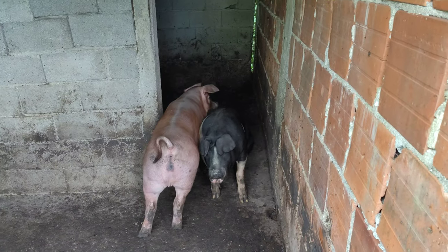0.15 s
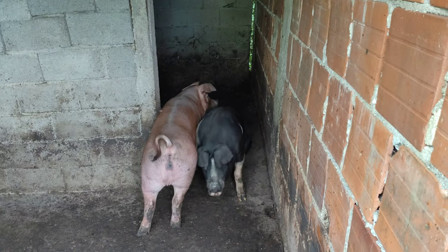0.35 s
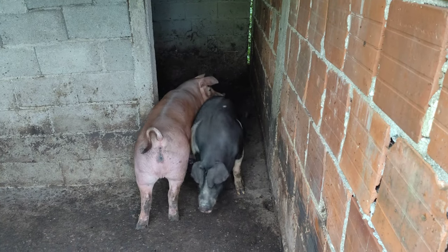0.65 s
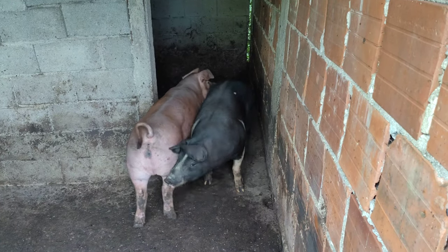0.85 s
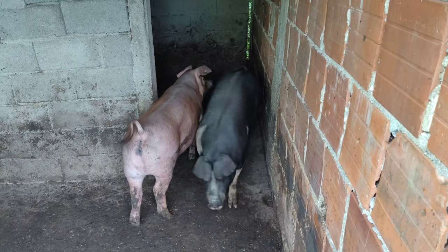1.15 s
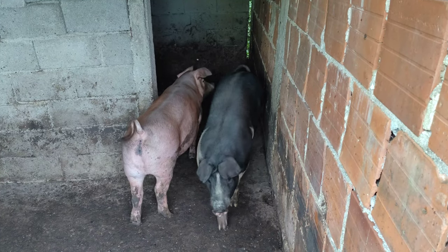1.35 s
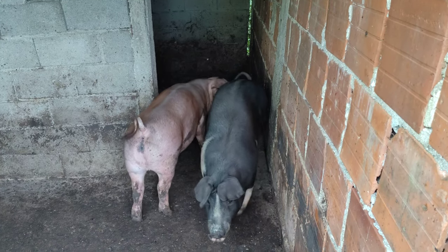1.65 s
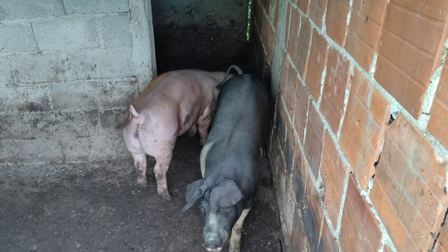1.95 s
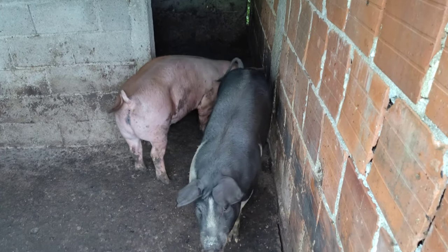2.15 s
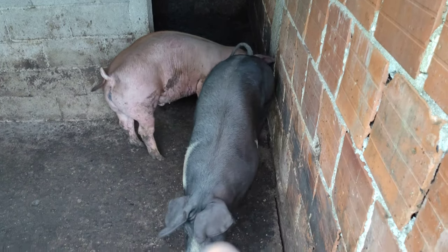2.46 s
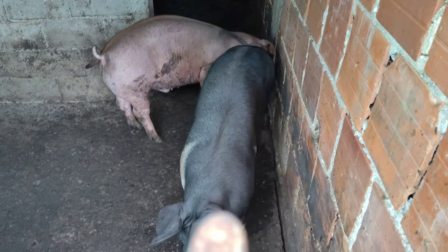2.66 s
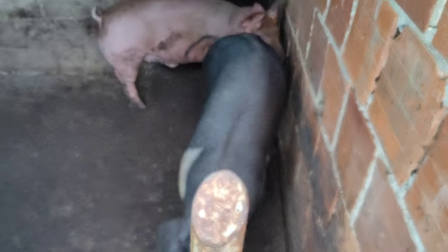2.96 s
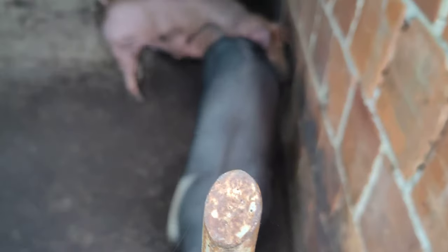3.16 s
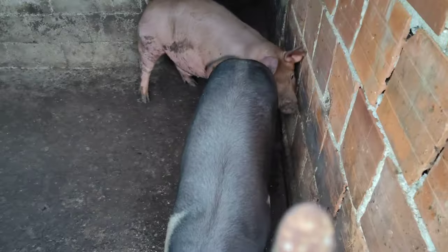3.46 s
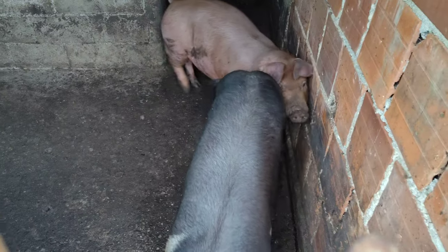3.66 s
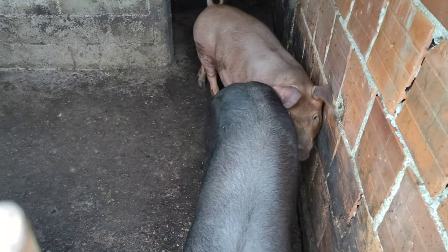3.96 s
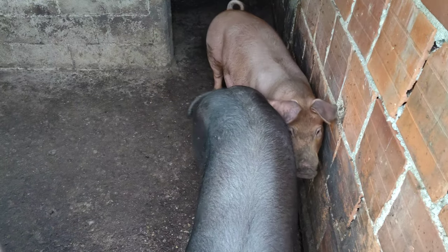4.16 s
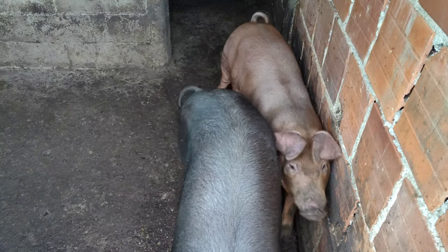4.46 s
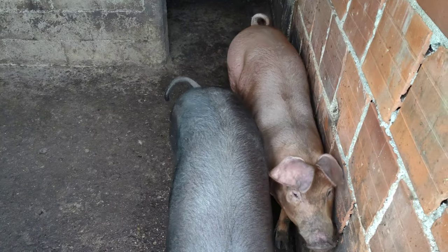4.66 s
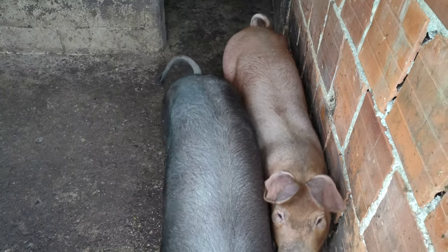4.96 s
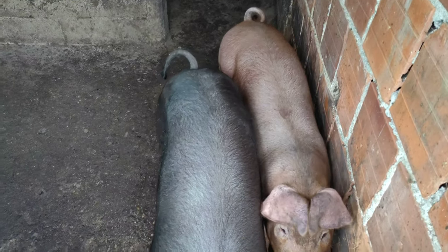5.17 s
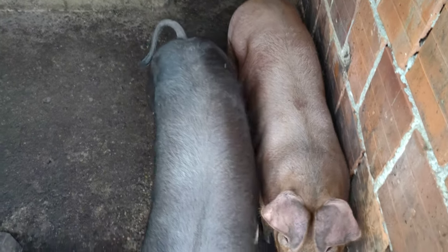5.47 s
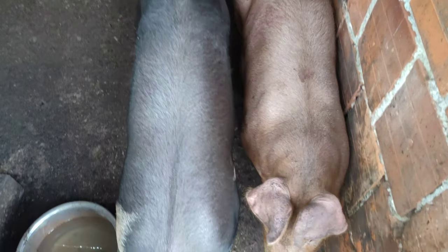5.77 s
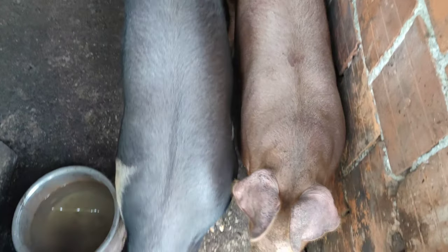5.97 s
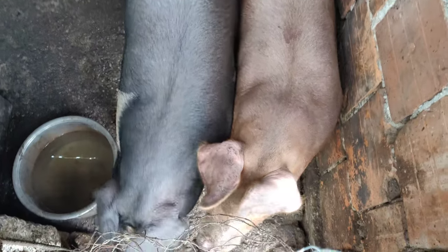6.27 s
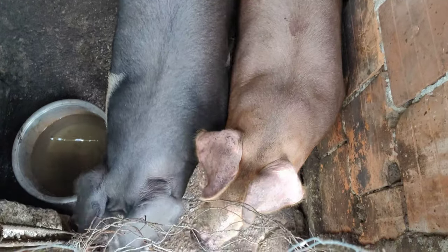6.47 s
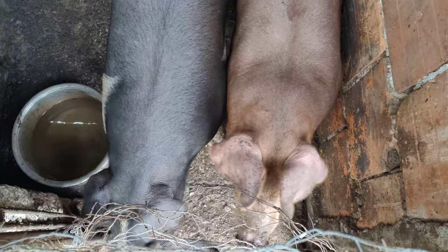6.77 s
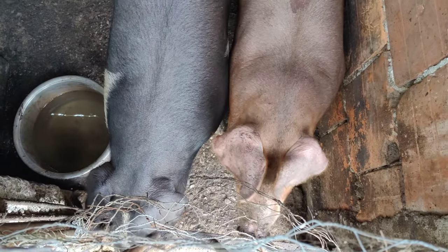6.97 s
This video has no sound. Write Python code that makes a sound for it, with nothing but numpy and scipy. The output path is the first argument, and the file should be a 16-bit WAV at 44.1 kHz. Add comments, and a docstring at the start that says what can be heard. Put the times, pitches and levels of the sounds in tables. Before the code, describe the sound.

Young pigs grunt close to a phone in a small hard-walled pen. A rough grunt and snort open, then sparse grunts, then a rattling growl around two seconds with a thin nostril whistle. Quick short grunts follow over trotters scraping on concrete, and another low growl rolls near the end. Short boomy echoes surround the voices.

```python
"""In a small concrete pen, young pigs grunt and growl close to a phone.
Grunts are separate slaps of the vocal folds, growls run on at 24 to 41 slaps a second;
each slap booms in the chest and rings in throat, mouth and nose, roughened by a puff of noise.
Snorts, whistles and murmurs are noise through single resonances; shuffling is three bands of noise.
The hard walls add early echoes, a short tail and standing waves; a faint whir comes through at the end."""
import sys
import numpy as np
from scipy import signal
from scipy.fft import rfft, irfft, next_fast_len
from scipy.io import wavfile
from scipy.ndimage import uniform_filter1d

SR = 44100
rng = np.random.default_rng(int(sys.argv[2]) if len(sys.argv) > 2 else 0)


def bounce(signal):
    """Save signal as a 16-bit WAV file at the path given by the first command-line argument."""
    frames = np.transpose(np.atleast_2d(signal))
    limited = np.clip(frames, -1, 1)
    pcm = np.round(limited * 32767).astype(np.int16)
    wavfile.write(sys.argv[1], SR, pcm)


N = 313711
TIME = np.arange(N) / SR


def amp(db):
    """Decibels to gain."""
    return 10 ** (np.asarray(db) / 20)


def unit(x):
    """Scales to rms 1."""
    return x / np.sqrt(np.mean(x ** 2) + 1e-30)


def read(points, hz):
    """Reads a table on a log-frequency axis."""
    f, value = np.transpose(points)
    return np.interp(np.log(hz + 1), np.log(f + 1), value)


def follow(rows, t):
    """Every column of a curve, read at t on its first column."""
    start, *columns = np.transpose(rows)
    return np.array([np.interp(t, start, column) for column in columns])


def add(mix, s, sound):
    """Mixes a stereo sound in at time s."""
    part = mix[:, max(round(s * SR), 0):][:, :sound.shape[1]]
    part += sound[:, :part.shape[1]]


def bell(f, hz, width):
    """Gain of one resonance."""
    return 1 / np.sqrt(1 + ((f ** 2 - hz ** 2) / (f * width + 1e-6)) ** 2)


def highpass(x, hz):
    """Second-order low cut."""
    return signal.sosfilt(signal.butter(2, hz, "high", fs=SR, output="sos"), x)


def noise(size, alike):
    """White noise for two microphones that share part of its power."""
    shared = rng.standard_normal(size)
    separate = rng.standard_normal((2, size))
    return np.sqrt(alike) * shared + np.sqrt(1 - alike) * separate


def coloured(gain, size, alike):
    """Stereo noise of rms 1 with the spectrum gain(Hz)."""
    padded = next_fast_len(size)
    spectrum = rfft(noise(padded, alike)) * gain(np.fft.rfftfreq(padded, 1 / SR))
    return unit(irfft(spectrum, padded)[:, :size])


def wobble(size, samples):
    """Smoothed noise of rms 1; more samples make it slower."""
    return unit(uniform_filter1d(rng.standard_normal(size), size=samples))


# fade of the far whir: (time [s], level [dB])
WHIR_FADE = [(6.5, -86), (6.65, -59.5), (7.11, -66)]


def whir():
    """A narrow band of far noise around 1400 Hz."""
    return amp(follow(WHIR_FADE, TIME)) * coloured(lambda f: bell(f, 1400, 220) ** 2, N, 0.2)


def swells(rows, count=3000):
    """Level of short movements, each rising to its peak and dying away exponentially."""
    t = np.linspace(0, TIME[-1], count)
    level = 0
    for s, length, db in rows:
        # the rise takes 0.98 of the length, the decay all of it
        level = level + amp(db) * np.exp(-np.maximum((s - t) / 0.98, t - s) / length)
    return np.interp(TIME, t, level)


def with_grunts(delay, length, db):
    """Level of the air each grunt pushes out, set by its mean belly and chest level."""
    return swells([(s + delay, length, (belly + chest) / 2 + db) for s, belly, chest, *_ in GRUNTS])


# spectra of the dull thuds, the scraping and the gritty hiss: (frequency [Hz], level [dB])
THUD_COLOUR = [(15, -24), (30, -1), (55, 11), (200, -2), (350, -13), (700, -21.5), (2000, -96)]
SCRAPE_COLOUR = [(150, 2.5), (350, -9), (550, 0.5), (800, -5), (1300, -5), (2000, -5.5), (3400, -10),
                 (5000, -16), (8000, -27), (15000, -50)]
HISS_COLOUR = [(1500, -17.5), (3500, 2.5), (5500, 0.5), (8000, -1.5), (10500, -6), (13000, -6.5),
               (15000, -39)]
# how busily the pigs shuffle about: (time [s], bustle [dB])
BUSTLE_CURVE = [(.15, -22), (.3, 3), (.55, -0.5), (.76, -4), (1.15, -11.5), (1.7, -12), (2.0, -4),
                (2.6, -6.5), (3.0, -4), (3.4, 5), (4.1, -11.5), (4.6, 3.5), (4.9, -1), (5.25, -1.5),
                (5.7, -8), (6.45, -2.5), (6.7, -11.5), (7.11, -17.5)]
# heavy steps: (time [s], length [s], level [dB])
HEAVY_STEPS = [(3.28, 0.021, -40), (4.44, 0.041, -39.5), (5.2, 0.22, -45.5)]
# scuffs of trotters and flanks, and hard-blown air: (time [s], length [s], level before the hiss trim [dB])
FLOOR_SCUFFS = [(.78, 0.069, -63.5), (.89, 0.024, -62), (1.51, 0.034, -69.5), (2.42, 0.031, -63.5),
                (2.89, 0.14, -68), (3.48, 0.011, -58), (3.71, 0.0099, -59.5), (3.79, 0.055, -62.5),
                (4.13, 0.13, -60), (4.49, 0.02, -49), (5.17, 0.058, -54.5)]
# (level at 0 dB of bustle, before the band's trim [dB], rise per dB of bustle [dB])
THUD_LAW, SCRAPE_LAW, HISS_LAW = (-56, 0.41), (-53.5, 0.97), (-70, 1.43)
SCRAPE_TRIM_DB, HISS_TRIM_DB = -3.5, 6.5
# a grunt's air, a low thump and then a breath:
#   (delay [s], length [s], level against belly and chest, before the band's trim [dB])
THUMP, EXHALE = (0.019, 0.035, -3), (0.093, 0.051, -20.5)


def shuffle():
    """Thuds, scraping and hiss of the concrete floor, mixed with the air of the grunts."""
    bustle = follow(BUSTLE_CURVE, TIME)[0]
    thud, scrape, hiss = (amp(db + slope * bustle) for db, slope in (THUD_LAW, SCRAPE_LAW, HISS_LAW))
    # levels add as powers
    thud = np.hypot(thud, swells(HEAVY_STEPS) + with_grunts(*THUMP))
    scrape = amp(SCRAPE_TRIM_DB) * np.hypot(scrape, with_grunts(*EXHALE))
    hiss = amp(HISS_TRIM_DB) * np.hypot(hiss, swells(FLOOR_SCUFFS))
    low = thud * coloured(lambda f: amp(read(THUD_COLOUR, f)), N, 0.99)
    middle = scrape * coloured(lambda f: amp(read(SCRAPE_COLOUR, f)), N, 0.56)
    high = hiss * coloured(lambda f: amp(read(HISS_COLOUR, f)), N, 0.06)
    grit = np.exp(0.057 * wobble(N, 60))
    drag = np.exp(0.48 * wobble(N, 2500))  # trotters catch and slide
    return low + grit * (middle + drag * high)


# ring of the pen: (frequency [Hz], time to fall 60 dB [s])
PEN_RING = [(80, 0.48), (200, 0.25), (500, 0.14), (1500, 0.13), (4000, 0.072), (12000, 0.081)]


def pen(x, size=SR // 2):
    """Dense wall echoes, each band dying at its own speed; the bass is alike at both microphones."""
    hz, t, z = signal.stft(rng.standard_normal((2, size)), SR, nperseg=512)
    alike = (1 / (1 + (hz / 1100) ** 2))[:, None]
    z[1] = alike * z[0] + np.sqrt(1 - alike ** 2) * z[1]
    decay = amp(-60 * t / read(PEN_RING, hz)[:, None])
    tail = signal.istft(z * decay, SR, nperseg=512)[1]
    # the tail fades in after 4 ms
    tail = tail * np.clip((np.arange(tail.shape[1]) / SR - .004) / 0.0027, 0, 1)
    return signal.fftconvolve(x, tail / np.linalg.norm(tail[0]), axes=1)[:, :N]


# standing waves between the walls: (frequency [Hz], width [Hz], level [dB])
STANDING_MODES = [(85.7, 7.8, -11.5), (169, 27, -2), (200.8, 10.7, -3), (248.6, 9.6, -4.5)]


def standing_waves(x):
    """The low modes of the pen ring on from one slap to the next."""
    ring = 0
    for hz, width, db in STANDING_MODES:
        ring = ring + amp(db) * signal.lfilter(*signal.iirpeak(hz, hz / width, fs=SR), x)
    return ring


# first echoes from the floor and the nearest walls: (delay [s], level [dB])
FIRST_ECHOES = [(.0047, -26.5), (0.0118, -31.5), (0.0165, -17.5)]


def walls(x):
    """The direct sound and its first echoes, which scatter the rasp more than the boom."""
    rasp = highpass(x, 400)
    out = x
    for delay, db in FIRST_ECHOES:
        out = out + amp(db) * np.pad(rasp, ((0, 0), (round(delay * SR), 0)))[:, :N]
    return out


def breaths(rows, flutter, size=SR // 2):
    """Air forced through one resonance of the snout: it swells, flutters and dies."""
    out, t = np.zeros((2, N)), np.arange(size) / SR
    for s, rise, decay, db, hz, width in rows:
        # low sounds are more alike at the two microphones
        air = coloured(lambda f: bell(f, hz, width) * bell(f, hz, 2 * width), size, 1 / (1 + hz / 7000))
        swell = np.minimum(t / rise, 1) * np.exp(-np.maximum(t - rise, 0) / decay)
        flap = np.exp(flutter * wobble(size, 180))
        add(out, s, amp(db) * swell * unit(air * flap))
    return out


# soft closed-mouth murmurs:
#   (time [s], rise [s], decay [s], level [dB], resonance [Hz], width [Hz])
MURMUR_ROWS = [(2.60, 0.04, 0.017, -38, 153, 123), (4.76, 0.018, 0.019, -35, 179, 40),
               (6.59, 0.021, 0.039, -51, 152, 138)]


def murmurs():
    """Low resonances of a closed mouth, excited by gently fluttering noise."""
    return breaths(MURMUR_ROWS, 0.11)


# whistling nostrils: (time [s], rise [s], decay [s], level [dB], resonance [Hz], width [Hz])
WHISTLE_ROWS = [(.275, 0.04, 0.025, -46, 2167, 110), (1.28, 0.038, 0.043, -58, 497, 50),
                (2.185, 0.04, 0.075, -44.5, 2810, 80), (5.88, 0.052, 0.06, -59, 3820, 220)]


def whistles():
    """Narrow nostril resonances turn breath noise into a pitch."""
    return breaths(WHISTLE_ROWS, .15)


# snorts and sniffs: (time [s], rise [s], decay [s], level [dB], resonance [Hz], width [Hz])
SNORT_ROWS = [(.197, 0.031, 0.061, -43, 3000, 2510), (.41, 0.02, 0.035, -48, 610, 373),
              (.694, 0.0029, 0.0075, -49, 1250, 600), (.72, 0.035, 0.027, -52.5, 1320, 1110),
              (.87, 0.0027, 0.047, -34, 1380, 840), (.87, 0.0036, 0.035, -37, 580, 300),
              (.87, 0.0023, 0.072, -42, 4100, 2430), (.892, .001, 0.003, -39, 1700, 2400),
              (1.25, 0.057, 0.047, -56.5, 3200, 2780), (4.425, 0.066, 0.041, -41.5, 3300, 3500),
              (5.13, 0.069, 0.035, -45, 680, 610), (5.324, 0.0092, 0.008, -48, 1700, 1310)]


def snorts():
    """Mostly wide snout resonances, with the strongest flutter of the breath sounds."""
    return breaths(SNORT_ROWS, 0.21)


# registers of the voice, belly, chest, throat, mouth, palate, nose, buzz:
#   (low edge [Hz], high edge [Hz])
VOICE_REGISTERS = [(68, 138), (140, 330), (370, 780), (860, 1780), (1950, 2550), (2600, 4300), (4600, 6600)]
# snout with the mouth half open: (resonance [Hz], width [Hz], level before the mouth's offset [dB])
SNOUT_RESONANCES = [(516, 130, -5.5), (690, 180, -10), (993, 160, -7), (1200, 360, -20), (1665, 160, -14),
                    (2214, 286, -6), (2870, 510, -11), (3730, 780, -15.5), (5000, 550, -6.5)]
ONSET = .02  # [s] from the start of the sound to the slap
BUZZ_HZ = 5440  # top resonance of grunts and lead-ins
# a shut mouth rings cleanly through the nose, an open one rasps: (mouth resonance [Hz],
#   resonance width [Hz], share of air [0-1], puff decay [s], offset of the snout resonances [dB])
SHUT, OPEN = (1001, 165, .62, .003, -2), (1520, 260, .97, .0045, 0)
# side branches of the nose swallow a band above the mouth resonance and one above the nose resonance
MOUTH_NOTCH_ABOVE_HZ, NOSE_NOTCH_RATIO, NOTCH_WIDTH_HZ, NOTCH_DEPTH = 555, 1.183, 510, 0.87


def slap(levels_db, chest_hz, throat_hz, mouth_hz, nose_hz, buzz_hz=BUZZ_HZ, size=6144):
    """One slap of the vocal folds with its puff of air, ringing through the registers."""
    f = np.fft.rfftfreq(size, 1 / SR)
    width, air, puff_s, snout_db = follow([SHUT, OPEN], mouth_hz)
    # power gains of the resonances
    snout = sum(amp(db + snout_db) ** 2 * bell(f, hz, wide) ** 4 for hz, wide, db in SNOUT_RESONANCES)
    body = bell(f, chest_hz, 16) ** 2
    body = body + (amp(-3) * bell(f, 94, 16)) ** 2 + (amp(-16) * bell(f, 258, 40)) ** 2
    tract = body + snout + bell(f, mouth_hz, width) ** 4 + bell(f, nose_hz, width) ** 4
    tract = tract + bell(f, throat_hz, 135) ** 4 + bell(f, buzz_hz, 2 * width) ** 4
    for hz in (mouth_hz + MOUTH_NOTCH_ABOVE_HZ, nose_hz * NOSE_NOTCH_RATIO):
        tract = tract * (1 - NOTCH_DEPTH * bell(f, hz, NOTCH_WIDTH_HZ) ** 2)
    power = 1e-11  # keeps the logarithm finite
    for (low, high), db in zip(VOICE_REGISTERS, levels_db):
        register = tract / (1 + (low / (f + 1)) ** 12) / (1 + (f / high) ** 22)
        power = power + amp(db) ** 2 * 0.019 * SR * register / register.mean()
    # resonators ring mostly after the blow: 0.8 of the minimum phase
    analytic = signal.hilbert(.5 * np.log(np.r_[power, power[-2:0:-1]]))[:len(f)]
    ring = np.sqrt(power) * np.exp(-1j * analytic.imag * .8)
    # pressure builds before the folds part, so the boom swells in a few ms ahead of the rasp
    ahead = 2 * np.pi * .005 * 350 * (1 - np.exp(-f / 350))
    # the puff roughens the upper resonances and leaves the boom clean
    t = np.arange(size) / SR
    puff_level = (1 - np.exp(-t / .0013)) ** 2 * (np.exp(-t / puff_s) + .03 * np.exp(-t / .025))
    puff = unit(noise(size, .75) * puff_level) / np.sqrt(size)
    airy = air * f ** 4 / (f ** 4 + 750 ** 4)
    drive = np.sqrt(1 - airy) + np.sqrt(airy) * rfft(puff)
    placed = np.exp(1j * (ahead - 2 * np.pi * f * ONSET))
    return irfft(ring * drive * placed) * signal.windows.tukey(size, .1)


# softer slaps that lead into the grunts:
#   (time [s], chest level [dB], throat level [dB], mouth level [dB], chest resonance [Hz])
LEAD_IN_SLAPS = [(0.16, -38.5, -50.5, -54, 215), (0.808, -38, -64, -67.5, 181.6),
                 (1.763, -35, -56, -50, 215), (2.461, -40.5, -54, -63, 254), (3.063, -39.5, -63, -62, 168),
                 (3.336, -40.5, -57, -49, 165), (3.369, -32.5, -49, -41, 182),
                 (3.596, -46, -62, -52.5, 169), (3.864, -34, -42.5, -44, 166),
                 (4.068, -43, -71, -54.5, 171), (4.105, -37, -60, -42.5, 181),
                 (4.293, -41.0, -79, -60, 184), (4.515, -36, -48, -53.5, 347),
                 (5.039, -39.5, -50, -45.5, 194), (5.495, -36, -59, -58.5, 260),
                 (5.824, -38.5, -57, -70, 217), (5.97, -37, -60, -70, 180)]
LEAD_DEPTH_DB = -8.5  # belly against chest: a lead-in is shallow


def lead_ins():
    """The folds part softly, the snout already shaped for the coming grunt."""
    out = np.zeros((2, N))
    for s, boom, throat, rasp, chest_hz in LEAD_IN_SLAPS:
        grunt = next(row for row in GRUNTS if row[0] > s)
        upper_db = np.array(grunt[4:8]) - grunt[4] + rasp  # mouth, palate, nose, buzz
        throat_mouth_nose_hz = grunt[9:12]
        levels_db = [boom + LEAD_DEPTH_DB, boom, throat, *upper_db]
        add(out, s - ONSET, slap(levels_db, chest_hz, *throat_mouth_nose_hz))
    return out


# one curve a growl: (time [s], slap rate [Hz],
#   levels of belly, chest, throat, mouth, palate, nose, buzz before jitter [dB],
#   resonances of chest, throat, mouth, nose [Hz])
GROWLS = [
    [(0.258, 33.14, -26, -36, -45, -49, -50, -51, -55, 186, 530, 1520, 3900),
     (0.33, 30.3, -48, -50, -66, -66, -64, -60, -68, 176, 520, 1310, 3800)],
    [(1.87, 34, -38.5, -37.5, -50, -48, -66, -56, -60, 166, 540, 1384, 3700),
     (1.933, 28.42, -39, -37.5, -58, -57, -59.5, -56.5, -60, 181, 537, 1010, 4100),
     (2.001, 30.73, -37, -32.5, -56, -52, -58, -52, -59, 168, 625, 940, 3300),
     (2.095, 32.96, -34, -37.5, -50.5, -52, -58, -54, -58, 201, 530, 904, 2970),
     (2.159, 30.31, -38.5, -40.5, -48, -50, -51, -47, -56, 270, 546, 964, 2740),
     (2.253, 34.8, -23, -40, -40.5, -49.5, -52, -39, -42, 192, 518, 970, 2800),
     (2.305, 40.8, -28, -38.5, -48.5, -61, -64, -49.5, -65, 209, 493, 980, 2850),
     (2.36, 33.3, -45, -43.5, -60, -64, -74, -58.5, -69, 155, 606, 1060, 2780),
     (2.426, 35.1, -42, -47, -55.5, -73, -79, -67, -81, 234, 507, 850, 2700)],
    [(6.084, 24.02, -36, -29.5, -55, -47, -64, -59, -60, 212, 560, 1520, 3000),
     (6.162, 27.58, -41.5, -34.5, -49.5, -51, -70, -67.5, -69, 178, 560, 1260, 3000),
     (6.232, 29.45, -35.5, -35.5, -47.5, -45, -59, -43, -52, 247, 520, 1040, 2900),
     (6.3, 28.83, -41, -37, -45, -42, -58, -50.5, -56, 195, 527, 1030, 2800),
     (6.37, 28.87, -40, -34, -45.5, -43, -57.5, -60, -61, 208, 516, 1000, 2850),
     (6.44, 28.33, -39.5, -36, -48, -60, -73, -68, -72, 212.4, 500, 962, 2770),
     (6.517, 29.24, -42.5, -41, -60, -57.5, -76, -79, -81, 191, 504, 1110, 2800)],
]
GROWL_BUZZ_HZ = [5550, 5550, 4900]  # top resonance in each growl
GROWL_JITTER_DB, GROWL_JITTER_S = 1.13, 0.00065  # rms spread of the slaps in level and time


def growls():
    """The folds keep slapping at a slow pace while levels and resonances glide."""
    out = np.zeros((2, N))
    for curve, buzz_hz in zip(GROWLS, GROWL_BUZZ_HZ):
        t = np.arange(curve[0][0], curve[-1][0], 1 / SR)
        cycles = np.floor(np.cumsum(follow(curve, t)[0]) / SR)
        for s in t[np.diff(cycles, prepend=-1) > 0]:  # one slap a cycle
            _, *voice = follow(curve, s)
            levels_db = voice[:7] + GROWL_JITTER_DB * rng.standard_normal(size=7)
            at = s + GROWL_JITTER_S * rng.standard_normal()
            add(out, at - ONSET, slap(levels_db, *voice[7:], buzz_hz))
    return out


# one row a grunt: (main slap time [s],
#   levels of belly, chest, throat, mouth, palate, nose, buzz [dB],
#   resonances of chest, throat, mouth, nose in the main slap [Hz],
#   gap to the after-slap [s], its boom change [dB], its rasp change [dB])
GRUNTS = [(0.196, -30, -33, -43, -33, -44, -41, -47, 186, 560, 1566, 3950, 0.031, 1.5, 1.5),
          (0.844, -40, -34.5, -56, -60.5, -53, -50.5, -62, 208, 540, 1580, 2630, 0.021, -5, -19),
          (1.201, -41, -50, -60.5, -59, -82, -87, -90, 155, 650, 1400, 3433, 0.03, -5, -16),
          (1.801, -28, -30.5, -51, -34, -58, -32.5, -42.5, 187, 547, 1423, 3880, 0.035, -5.5, -14),
          (2.493, -37, -38, -46, -52, -43.5, -39.5, -52, 202, 580, 976, 2784, 0.033, 2.5, 0),
          (3.101, -33.5, -32.5, -39.5, -34.5, -56, -37, -43, 192, 563, 1430, 3660, 0.031, 1, -5),
          (3.404, -34, -30, -35.5, -35, -46, -45, -52, 202, 554, 1170, 3210, 0.031, -2, -4),
          (3.635, -36.5, -34.5, -46, -33, -45.5, -38.5, -53, 190.4, 474, 1126, 3340, 0.031, 2.5, -16),
          (3.898, -33.5, -32, -47, -38.5, -45.5, -47, -56, 190.5, 498, 1130, 3340, 0.035, -14, -17.5),
          (4.139, -34.5, -33.5, -55, -41, -51.5, -45, -53, 190.6, 525, 1025, 3380, 0.043, -25, -12),
          (4.316, -37.5, -31.5, -54, -43.5, -58, -45.5, -58.5, 192, 453, 1016, 2990, 0.025, -10.5, -29),
          (4.548, -39, -34, -54, -49, -53, -50, -56, 180.6, 518, 960, 3300, 0.027, -17, -21),
          (4.736, -38, -34, -54, -55.5, -56, -52, -57, 195.5, 430, 1440, 3200, 0.027, -8, -19),
          (5.074, -35, -28.5, -37.5, -39, -41, -43, -47.5, 214.5, 616, 1650, 2710, 0.021, 4.5, -2),
          (5.522, -36, -27, -47.5, -35.5, -42.5, -39.5, -55, 201.5, 554, 1500, 2700, 0.031, -2.5, -9),
          (5.844, -35.5, -29.5, -39.5, -50.5, -55, -46, -59, 202, 515, 1570, 3870, 0.036, -1.5, -5),
          (6.012, -32.5, -30, -47.5, -36.5, -49.5, -40, -51.5, 182, 550, 1477, 2780, 0.036, -0.5, -7)]
SLAP_GAP_S = 0.03  # between the slaps that follow the main one
SAG_PER_SLAP, MOUTH_CLOSING = 0.051, 0.044  # share of chest and of mouth pitch lost with each
RELEASE_DB, AFTER_RASP_DB = -10.5, -13.5  # further change of boom and rasp with each slap after the first
AFTER_DEPTH_DB = -2  # belly change against chest change


def grunts(count=3):
    """The main slap and its after-slap, then weaker ones that sink, dull and die away."""
    out = np.zeros((2, N))
    for s, *voice, gap, boom_change, rasp_change in GRUNTS:
        levels_db, pitches = np.array(voice[:7]), np.array(voice[7:])
        add(out, s - ONSET, slap(levels_db, *pitches))
        for k in range(count):
            at = s + gap + k * SLAP_GAP_S
            # inside a growl the grunt runs on as that growl
            if any(curve[0][0] - SLAP_GAP_S / 2 < at < curve[-1][0] for curve in GROWLS):
                continue
            boom = boom_change + k * RELEASE_DB
            rasp = rasp_change + k * AFTER_RASP_DB
            fade_db = [boom + AFTER_DEPTH_DB, boom, (boom + rasp) / 2, rasp, rasp, rasp, rasp]
            sag = 1 - (k + 1) * np.array([SAG_PER_SLAP, 0, MOUTH_CLOSING, 0])
            add(out, at - ONSET, slap(levels_db + fade_db, *(pitches * sag)))
    return out


def scene():
    """The pigs stand a little to the left, so that microphone hears them first."""
    voices = walls(lead_ins() + grunts() + growls())
    pigs = voices + snorts() + whistles() + murmurs()
    # below 357 Hz the tail thins out and the standing waves take over
    tail = amp(-4) * pen(highpass(pigs, 357))
    near = pigs + tail + standing_waves(pigs) + shuffle()
    right = np.pad(near[1], (4, 0))[:N]  # 4 samples late
    return np.array([near[0], right]) + whir()


def record(dry):
    """The phone's band limit: a steep linear-phase low-pass at 15250 Hz."""
    lowpass = signal.firwin(511, 15250, window=("kaiser", 9), fs=SR)
    return signal.oaconvolve(dry, lowpass[None], "same")


dry = scene()
out = record(dry)
bounce(out)
```